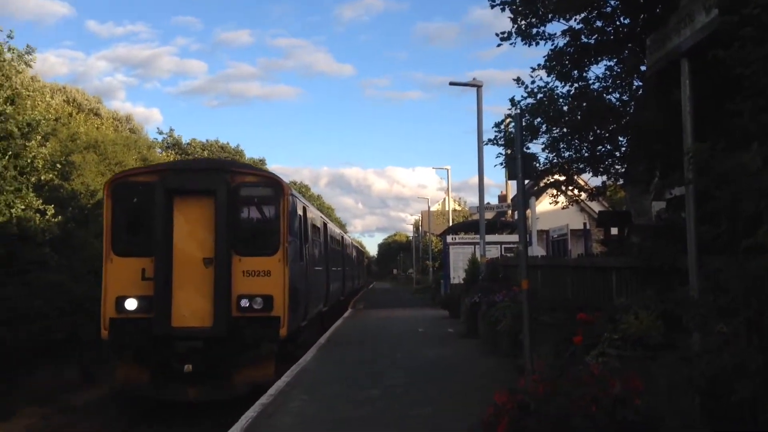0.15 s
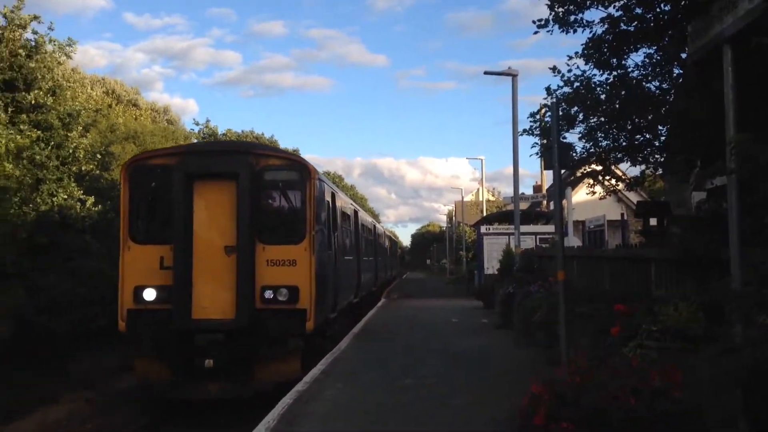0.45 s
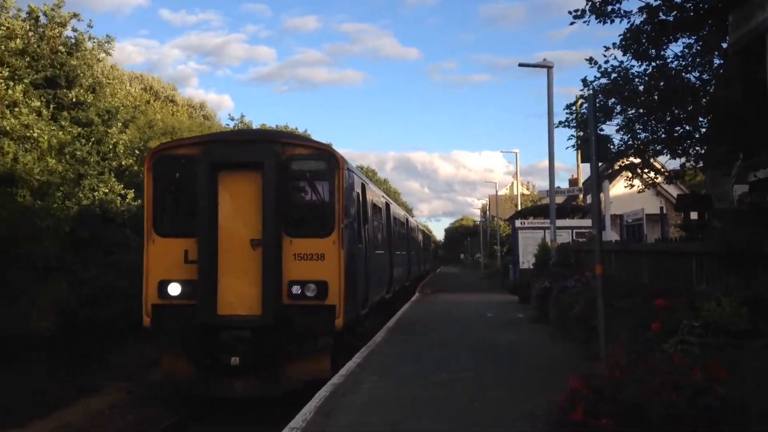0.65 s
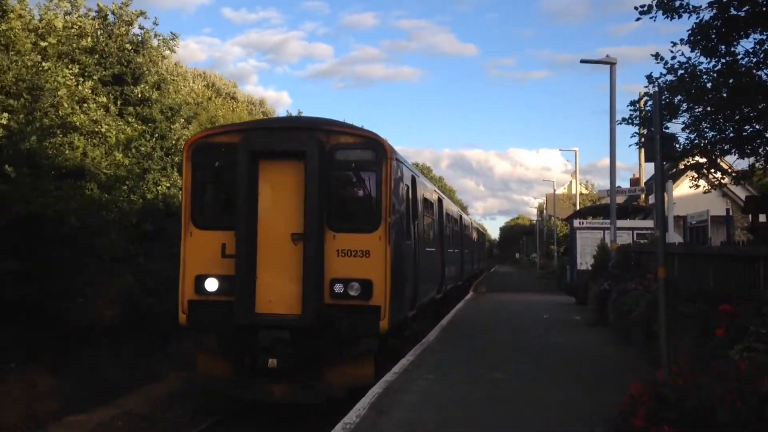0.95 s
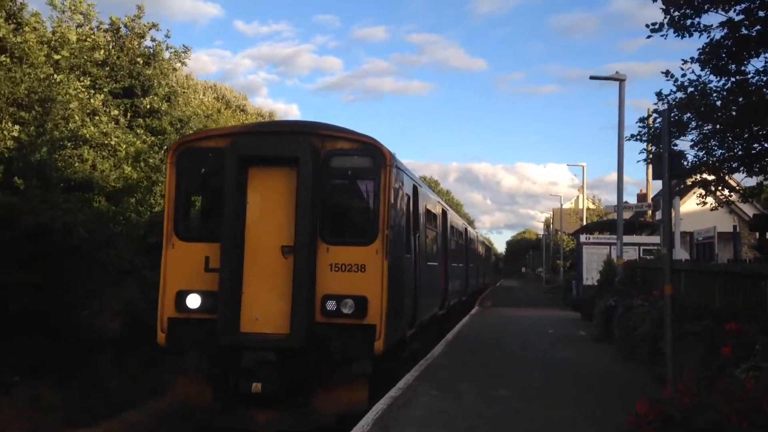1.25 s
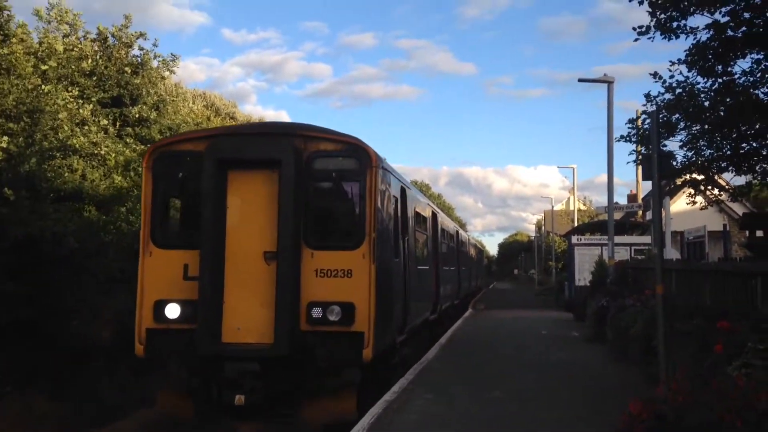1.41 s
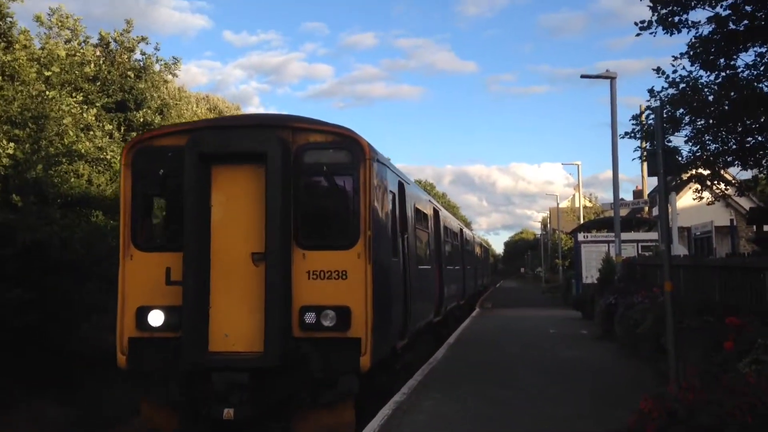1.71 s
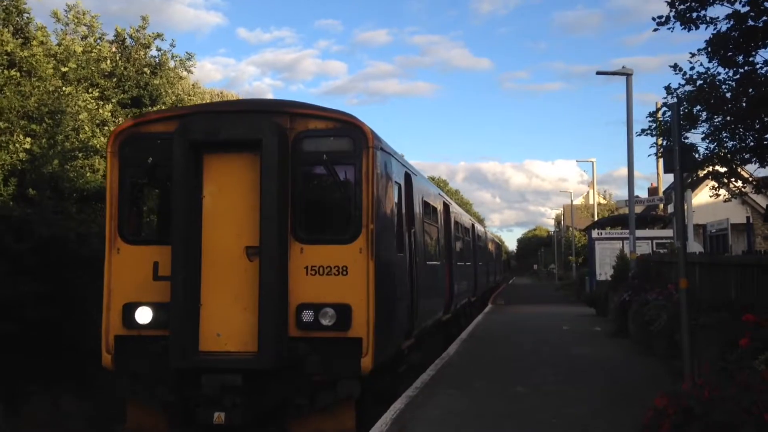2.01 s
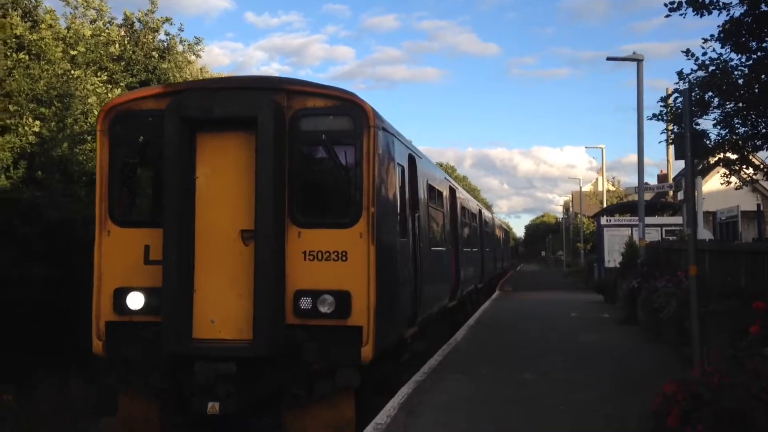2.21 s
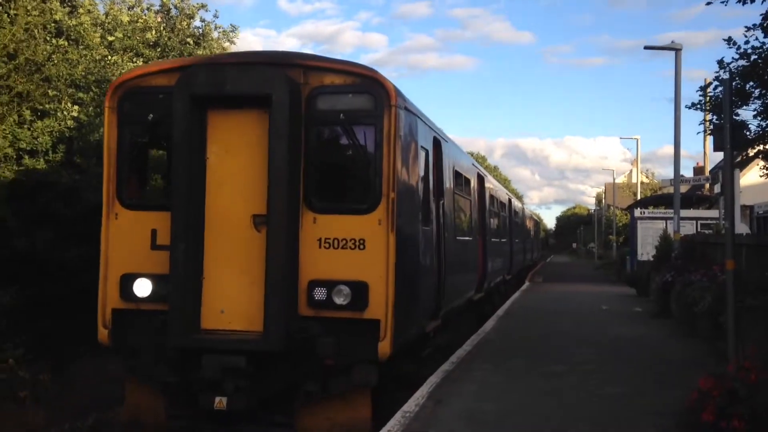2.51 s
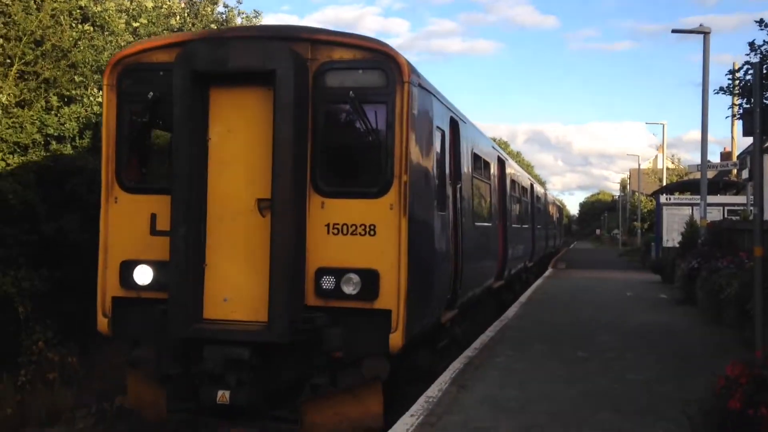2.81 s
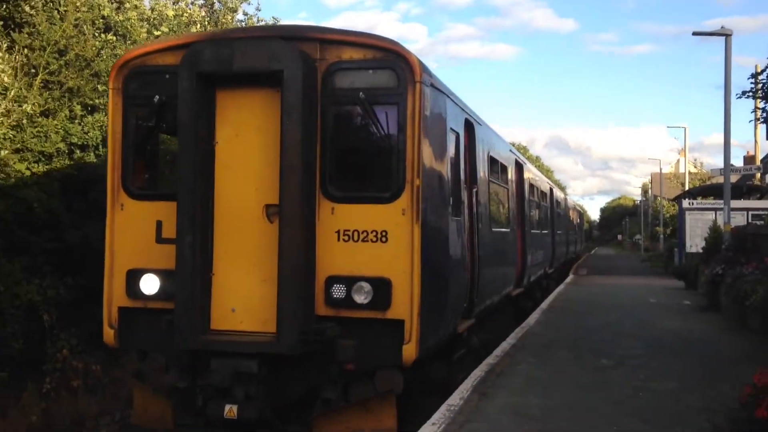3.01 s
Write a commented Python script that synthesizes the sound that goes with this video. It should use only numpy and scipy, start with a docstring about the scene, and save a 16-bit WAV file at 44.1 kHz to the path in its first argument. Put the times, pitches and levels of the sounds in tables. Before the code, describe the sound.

Train brakes squeal with a rough, wavering tone as a diesel train nears a station platform. A higher squeal swells and sags in pitch among short squeaks and hiss, over the engine and rumbling wheels.

```python
"""A rough squeal near 820 Hz, rasping with overtones, sounds as a diesel train brakes into a platform.
It is a stick-slip oscillation of the brake blocks on the wheels, whose resonances ring when the blocks bite.
A second squeal near 1400 Hz sags and swells as the train nears, among a lower groan, squeaks and hiss.
Under them run the engine, the rumble of the wheels and a thin whistle; trees and buildings scatter the
sound of the brakes and the whistle."""
import sys
import numpy as np
from scipy import signal
from scipy.fft import rfft, irfft, next_fast_len
from scipy.io import wavfile
from scipy.ndimage import map_coordinates

SR = 44100
rng = np.random.default_rng(int(sys.argv[2]) if len(sys.argv) > 2 else 0)


def generate_wav(sig):
    """Save sig (samples, or channels by samples) to the path in sys.argv[1] as 16-bit PCM at SR."""
    pcm = np.round(np.clip(np.atleast_2d(sig).T, -1, 1) * 32767).astype(np.int16)
    wavfile.write(sys.argv[1], SR, pcm)


N = 138915

# common pitch of the low squeal (time [s], frequency [Hz])
LOW_PITCH = [(0, 852), (.15, 831), (.38, 856.8), (.52, 818.6), (.74, 828.6), (.92, 804.5), (1.08, 839),
             (1.4, 817), (1.55, 845), (1.7, 816.3), (1.86, 834.2), (2.1, 812.6), (2.42, 857), (2.55, 818.6),
             (2.66, 849.4), (2.78, 801.3), (3.02, 804), (3.15, 796)]
# envelope of its fundamental (time [s], level [dB])
LOW_LEVEL = [(0.02, -31), (0.05, -30), (0.17, -34.5), (0.42, -27.5), (0.45, -34), (0.51, -24), (0.59, -30),
             (1.26, -28.5), (1.5, -31), (1.52, -27.5), (1.8, -31.5), (1.94, -28.5), (1.96, -37),
             (2.01, -26.5), (2.23, -33), (2.27, -44.5), (2.44, -24.5), (2.5, -38), (2.51, -23.5),
             (2.61, -29), (2.8, -27), (3.12, -30)]
# how hard the blocks bite: envelope of overtones, hiss and twitter (time [s], level [dB])
BITE = [(0, -36), (.11, -45.5), (.15, -38.5), (.27, -49), (.37, -49), (.43, -37.5), (.52, -35), (.585, -39),
        (.76, -37.5), (.83, -43.5), (.9, -36.5), (.94, -40), (.995, -36.5), (1.02, -44), (1.065, -35),
        (1.1, -38.5), (1.2, -47), (1.27, -39), (1.32, -45), (1.41, -35.5), (1.47, -40.5), (1.68, -40),
        (1.73, -37.5), (1.78, -41), (1.83, -36.5), (1.9, -38.5), (1.96, -33.5), (2.01, -43.5), (2.08, -35),
        (2.14, -48.5), (2.3, -50.5), (2.365, -47), (2.4, -39), (2.51, -34.5), (2.59, -36), (2.68, -42.5),
        (2.72, -32), (2.87, -32), (3.03, -30), (3.15, -29)]
# blocks of the low squeal (pitch ratio [1], fundamental gain [dB], overtone gain [dB])
LOW_BLOCKS = [(1.02, -2.5, 0), (.975, -4.5, 0.5)]
# resonances of wheel and brake gear (frequency [Hz], width [Hz], gain [dB])
WHEEL_MODES = [(1591, 220, -1), (2175, 235, -0.5), (2417, 222, -0.5), (3182, 240, -3.5), (3905, 336, -3.5),
               (4750, 410, -9), (5485, 280, -9.5), (6306, 330, -17.5), (6970, 580, -23), (8940, 520, -32)]
# common pitch of the high squeal (time [s], frequency [Hz])
HIGH_PITCH = [(0, 1441), (.5, 1421), (.63, 1376), (1.1, 1464), (1.5, 1399), (1.87, 1414), (1.96, 1344),
              (2.05, 1423), (2.38, 1410), (2.5, 1306), (2.58, 1397), (2.66, 1330), (2.8, 1325),
              (2.98, 1298), (3.09, 1211), (3.15, 1243)]
# its envelope (time [s], level [dB])
HIGH_LEVEL = [(0.03, -42), (0.05, -46.5), (0.48, -42), (0.5, -32), (0.55, -41), (0.61, -32.5),
              (0.88, -44.5), (0.92, -30.5), (0.98, -45), (1.36, -40.5), (1.55, -30), (1.68, -38),
              (1.87, -28), (1.91, -35.5), (1.96, -28), (2.04, -39), (2.15, -31), (2.32, -38), (2.49, -25),
              (2.53, -40), (2.65, -25.5), (2.7, -35), (2.78, -31.5), (2.86, -25.5), (2.89, -33.5),
              (3.02, -22), (3.04, -29), (3.12, -23)]
# its blocks (pitch ratio [1], gain [dB])
HIGH_BLOCKS = [(1, -0.5), (1.075, -6)]
# weighting of its harmonics (frequency [Hz], gain [dB])
HIGH_COLOUR = [(1400, 2), (2750, -24), (4100, -18), (5500, -28)]
# groan of the lowest block (time [s], frequency [Hz], level [dB])
DEEP_BLOCK = [(0, 722.5, -50.5), (0.601, 732, -40.5), (1.4, 734.2, -47), (1.62, 710, -32.5),
              (1.849, 719.3, -45), (2.15, 754.5, -38.5), (2.4, 739.5, -53), (2.7, 753, -36),
              (2.849, 734, -32.5), (3.15, 720.5, -36)]
# scraping of the blocks (frequency [Hz], relative spectral density [dB])
SCRAPE_SPECTRUM = [(500, -23), (1000, -1), (1850, -7), (2250, 5.5), (2600, -7), (2800, -16), (3050, -3),
                   (3400, 0.5), (4200, -4), (5500, -6), (7500, -17.5), (10000, -18), (15000, -25)]
# finest friction hiss (frequency [Hz], relative spectral density [dB])
FIZZ_SPECTRUM = [(3000, -26), (6500, 5), (9000, -6), (15000, -13)]
# engine exhaust (frequency [Hz], relative spectral density [dB])
EXHAUST_SPECTRUM = [(20, -19), (40, -11), (72, -1.5), (125, -3.5), (180, -1.5), (260, -9.5), (500, -27.5),
                    (1500, -73)]
# its envelope (time [s], level [dB])
EXHAUST_LEVEL = [(0, -40.5), (1.7, -41), (2.5, -43.5), (3.15, -46)]
# tones of the engine (frequency [Hz], level at mid-scene [dB])
ENGINE_LINES = [(97, -53), (184, -53), (355, -50), (445, -58.5)]
# rolling noise of the wheels (frequency [Hz], relative spectral density [dB])
RUMBLE_SPECTRUM = [(40, -38), (150, -14.5), (250, -2.5), (340, 0), (520, -7), (1000, -3.5), (1900, -8.5),
                   (2400, -4.5), (2780, -17), (3300, -11), (4500, -16), (8000, -32.5), (15000, -36.5)]
# envelope of the whistle (time [s], level [dB])
WHISTLE_LEVEL = [(0, -57), (.55, -58.5), (.82, -51.5), (1.05, -57.5), (1.45, -53.5), (2, -58.5),
                 (2.27, -64), (2.33, -85)]
# short squeals of single blocks (centre time [s], half length [s], frequency [Hz], level [dB])
CHIRPS = [(.39, 0.074, 860.4, -25), (0.656, 0.019, 2518, -28), (1.05, .012, 903, -28),
          (1.517, 0.013, 857, -26.5), (1.558, 0.019, 853, -26), (1.56, 0.044, 1440, -34),
          (1.722, 0.027, 2495, -30.5), (1.809, 0.023, 2435, -27.5), (1.933, 0.037, 4390, -38),
          (1.962, .025, 3990, -34), (1.965, 0.019, 1306, -26), (2.426, 0.051, 860.3, -27),
          (2.458, 0.06, 1365, -38), (2.505, 0.066, 3393, -36), (2.723, 0.027, 2433, -26.5),
          (2.728, 0.028, 3277, -34), (2.73, 0.04, 5530, -39), (2.791, 0.023, 3817, -28.5),
          (2.807, 0.088, 1444, -23), (2.893, 0.031, 1590, -24.5), (3.05, 0.036, 1587, -24.5),
          (2.995, .035, 3240, -30.5), (3.036, 0.027, 5510, -35), (3.064, 0.045, 2443, -26),
          (3.1, .04, 1210, -24)]
# reverberation among trees and buildings (frequency [Hz], time to decay by 60 dB [s])
STATION_DECAY = [(500, 0.3), (2500, 0.15), (10000, 0.13)]

WANDER, JITTER = .012, .016  # slow and fast pitch deviation at roughness 1, as fractions
WANDER_RATE, JITTER_RATE, FLUTTER_RATE, CHATTER_RATE = 40, 230, 110, 130  # random values per second
FLUTTER_DB, RASP_DB, CHATTER_CYCLES = 2.8, 3, 0.076
WHEEL_FLOOR_DB = -29
SCRAPE_DB, FIZZ_DB, FIZZ_DB_PER_S = -5, -25, 2
SQUEAK_SAG = .04  # fall of pitch over one squeak, as a fraction
TWITTER_PER_S, TWITTER_HALF_S = 70, .016
TWITTER_DB, TWITTER_SCATTER_DB, TWITTER_DETUNE = 3.5, 3, 0.0304
THROB_DB, THROB_RATE = 1.8, 22
HUM_SPREAD_HZ, HUM_DB_PER_S = 5.98, 3.5
RUMBLE_DB, RUMBLE_DB_PER_S = -38.5, 1.06
WHISTLE_HZ, WHISTLE_SPREAD_HZ = 12522, 45
TREBLE_HZ, TREBLE_DB_PER_S = 4600, 1.3
ECHO_DB, TOP_HZ = -3.5, 15300

TIME = np.arange(N) / SR
FROM_MIDDLE_S = TIME - N / SR / 2


def amp(db):
    """Amplitude ratio of a level in decibels."""
    return 10 ** (np.asarray(db) / 20)


def unit(x):
    """Normalisation to rms 1."""
    return x / np.sqrt(np.mean(x ** 2) + 1e-20)


def along(points, hz):
    """Interpolation on a logarithmic frequency axis."""
    freqs, values = np.transpose(points)
    return np.interp(np.log(hz + 1), np.log(freqs + 1), values)


def curve(rows):
    """Linear interpolation in time, one value per sample."""
    return np.interp(TIME, *np.transpose(rows))


def wobble(rate):
    """Smooth random modulation through `rate` values a second."""
    return map_coordinates(rng.standard_normal(4096), [TIME * rate], mode="wrap")


def filtered(x, response):
    """Linear filtering: the spectrum times a frequency response."""
    size = next_fast_len(N + SR // 2)
    return irfft(rfft(x, size) * response(np.fft.rfftfreq(size, 1 / SR)), size)[:N]


def noise(spectrum):
    """Spectrally shaped white noise of rms 1."""
    return unit(filtered(rng.standard_normal(N), lambda hz: amp(along(spectrum, hz))))


def phase_of(hz):
    """Phase as the integral of frequency, from a random start."""
    return 2 * np.pi * (np.cumsum(hz) / SR + rng.random())


def flutter(depth_db, rate=FLUTTER_RATE):
    """Random amplitude modulation, as a gain of rms 1."""
    return unit(amp(depth_db * wobble(rate)))


def stick_slip(hz, roughness):
    """Phase of a stick-slip oscillation, whose uneven slips modulate the frequency."""
    deviation = WANDER * wobble(WANDER_RATE) + JITTER * wobble(JITTER_RATE)
    return phase_of(hz * (1 + roughness * deviation))


def harmonics(phase, hz, colour, first, last):
    """Harmonic series with random phases, weighted by a spectral envelope."""
    return np.sqrt(2) * sum(amp(along(colour, k * hz)) * np.sin(k * phase + 2 * np.pi * rng.random())
                            for k in range(first, last + 1))


def fundamental(phase):
    """A block's lowest tone: changing grip modulates its amplitude, chatter its phase."""
    chatter = 2 * np.pi * CHATTER_CYCLES * wobble(CHATTER_RATE)
    return flutter(FLUTTER_DB) * np.sqrt(2) * np.sin(phase + chatter)


def wheel(force):
    """Forced vibration: the wheel responds most near its resonances. The result has rms 1."""
    def response(hz):
        floor = amp(WHEEL_FLOOR_DB) / (1 + (hz / WHEEL_MODES[-1][0]) ** 4)
        peaks = sum(amp(db) / (1 + ((hz - centre) / width) ** 2) ** 3
                    for centre, width, db in WHEEL_MODES)
        return floor + peaks
    return unit(filtered(force, response))


def low_squeal():
    """Two blocks stick and slip at nearly one pitch; their overtones ring the wheel as they bite."""
    hz, level, bite = curve(LOW_PITCH), curve(LOW_LEVEL), curve(BITE)
    out = np.zeros(N)
    for ratio, tone_db, overtone_db in LOW_BLOCKS:
        phase = stick_slip(hz * ratio, roughness=1.25)
        slips = harmonics(phase, hz.mean(), colour=[(1000, 0)], first=2, last=13)  # flat spectrum
        out += amp(level + tone_db) * fundamental(phase)
        out += amp(bite + overtone_db) * flutter(RASP_DB) * wheel(slips)
    return out


def high_squeal():
    """Friction drives a higher mode of the wheel; the pitch sags as the train slows."""
    hz, level = curve(HIGH_PITCH), curve(HIGH_LEVEL)
    out = np.zeros(N)
    for ratio, db in HIGH_BLOCKS:
        phase = stick_slip(hz * ratio, roughness=1.45)
        tone = harmonics(phase, hz.mean() * ratio, HIGH_COLOUR, first=1, last=4)
        out += amp(level + db) * flutter(FLUTTER_DB) * tone
    return out


def deep_squeal():
    """Stick-slip of one more block, faint at first, groans below the others."""
    rows = np.array(DEEP_BLOCK)
    hz, level = curve(rows[:, [0, 1]]), curve(rows[:, [0, 2]])
    return amp(level) * fundamental(stick_slip(hz, roughness=1.049))


def scrape():
    """Sliding friction radiates broadband hiss that follows the bite and brightens as the train nears."""
    coarse = amp(SCRAPE_DB) * noise(SCRAPE_SPECTRUM)
    fine = amp(FIZZ_DB + FIZZ_DB_PER_S * FROM_MIDDLE_S) * noise(FIZZ_SPECTRUM)
    return amp(curve(BITE)) * flutter(depth_db=-1.1) * (coarse + fine)


def squeak(centre_s, half_s, hz, db):
    """Brief excitation of one mode: a block catches, sings with falling pitch and lets go."""
    out = np.zeros(N)
    span = np.arange(max(0, int((centre_s - half_s) * SR)), min(N, int((centre_s + half_s) * SR)))
    position = (span / SR - centre_s) / half_s  # -1 to 1
    envelope = amp(db) * np.cos(np.pi * position / 2) ** 2
    out[span] = envelope * np.sqrt(2) * np.sin(phase_of(hz * (1 - SQUEAK_SAG * position / 2)))
    return out


def twitter():
    """Random excitation of the wheel's modes gives many tiny squeaks whose level follows the bite."""
    out, bite = np.zeros(N), curve(BITE)
    for when, mode, strength, tuning, length in rng.random((int(TWITTER_PER_S * N / SR), 5)):
        mode_hz, _, mode_db = WHEEL_MODES[int(mode * len(WHEEL_MODES))]
        level = bite[int(when * N)] + mode_db + TWITTER_DB + TWITTER_SCATTER_DB * (2 * strength - 1)
        hz = mode_hz * (1 + TWITTER_DETUNE * (2 * tuning - 1))
        out += squeak(when * N / SR, TWITTER_HALF_S * (.5 + length), hz, level)
    return out


def engine():
    """Throbbing exhaust noise under an unsteady line spectrum that grows as the train nears."""
    exhaust = amp(curve(EXHAUST_LEVEL)) * flutter(THROB_DB, THROB_RATE) * noise(EXHAUST_SPECTRUM)
    hum = np.zeros(N)
    for hz, db in ENGINE_LINES:
        phase = phase_of(hz + HUM_SPREAD_HZ * wobble(rate=40))
        hum += amp(db) * flutter(depth_db=3.9, rate=25.01) * np.sqrt(2) * np.sin(phase)
    return exhaust + amp(HUM_DB_PER_S * FROM_MIDDLE_S) * hum


def rumble():
    """Rolling contact of the wheels radiates noise that grows as the distance shrinks."""
    return amp(RUMBLE_DB + RUMBLE_DB_PER_S * FROM_MIDDLE_S) * noise(RUMBLE_SPECTRUM)


def whistle():
    """A thin, very high tone, broadened by random modulation, that dies away near 2.3 s."""
    phase = phase_of(WHISTLE_HZ + WHISTLE_SPREAD_HZ * wobble(rate=240))
    return amp(curve(WHISTLE_LEVEL)) * flutter(depth_db=4) * np.sqrt(2) * np.sin(phase)


def chirps():
    """Transient stick-slip of single blocks: short squeals that stand out."""
    return sum(squeak(*row) for row in CHIRPS)


def nearing(x):
    """Treble loss with distance: far brakes are duller than near ones."""
    treble = filtered(x, lambda hz: 1 - 1 / (1 + (hz / TREBLE_HZ) ** 10))
    return x + (amp(TREBLE_DB_PER_S * FROM_MIDDLE_S) - 1) * treble


def station(direct):
    """Scattering: trees and buildings add echoes whose paths change as the train moves."""
    echoes = np.zeros(N)
    moments = np.linspace(0, TIME[-1], 12)  # one impulse response for each position of the train
    for moment in moments:
        hz, age, spectra = signal.stft(rng.standard_normal(SR // 2), SR, nperseg=256)
        decay = amp(-60 * age / along(STATION_DECAY, hz)[:, None])
        tail = signal.istft(spectra * decay, SR, nperseg=256)[1]
        crossfade = np.sqrt(np.clip(1 - abs(TIME - moment) / moments[1], 0, 1))
        echoes += signal.fftconvolve(direct * crossfade, tail)[:N]
    echo_gain = amp(ECHO_DB)
    return (direct + echo_gain * unit(echoes) * direct.std()) / np.sqrt(1 + echo_gain ** 2)


def scene():
    """Superposition of the scattered brakes and whistle with the direct engine and rumble."""
    brakes = low_squeal() + high_squeal() + deep_squeal() + scrape() + twitter() + chirps()
    return (station(nearing(brakes) + whistle()) + engine() + rumble())[None]


def record(dry):
    """Band limiting: an ideal low-pass filter removes everything above TOP_HZ."""
    return filtered(dry[0], lambda hz: hz < TOP_HZ)[None]


dry = scene()
out = record(dry)
generate_wav(out)
```